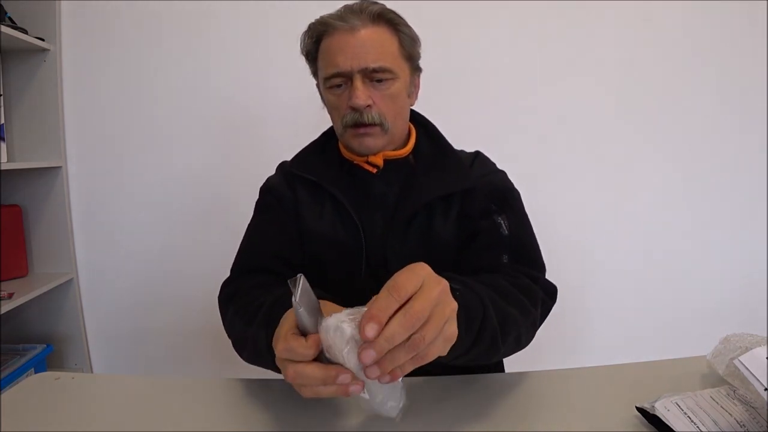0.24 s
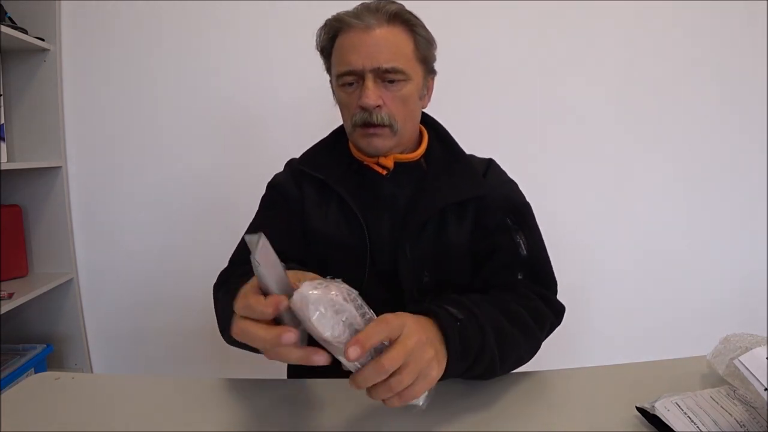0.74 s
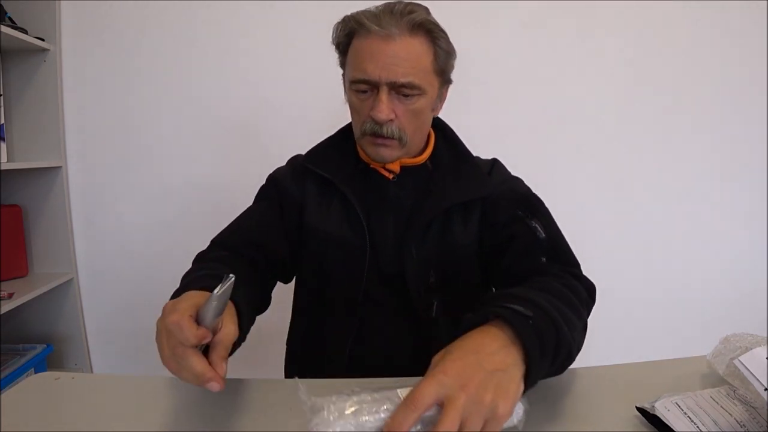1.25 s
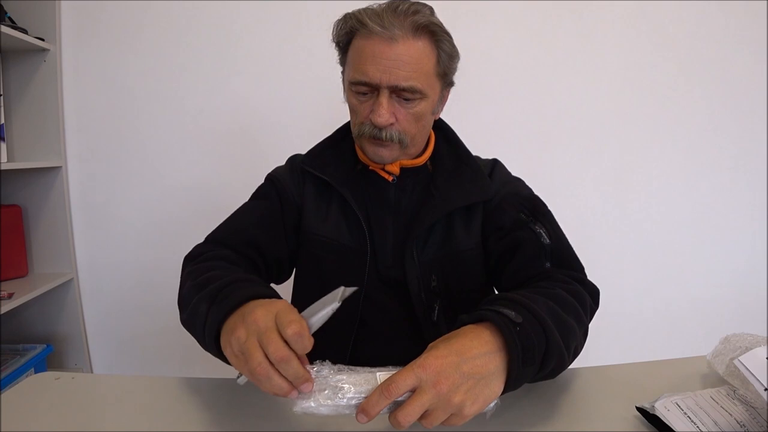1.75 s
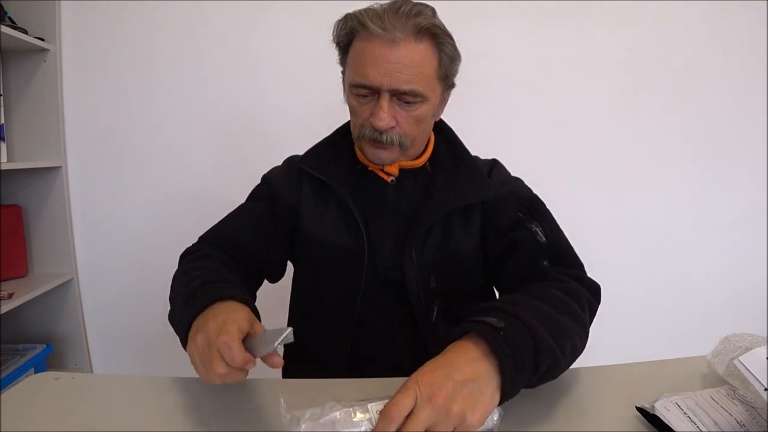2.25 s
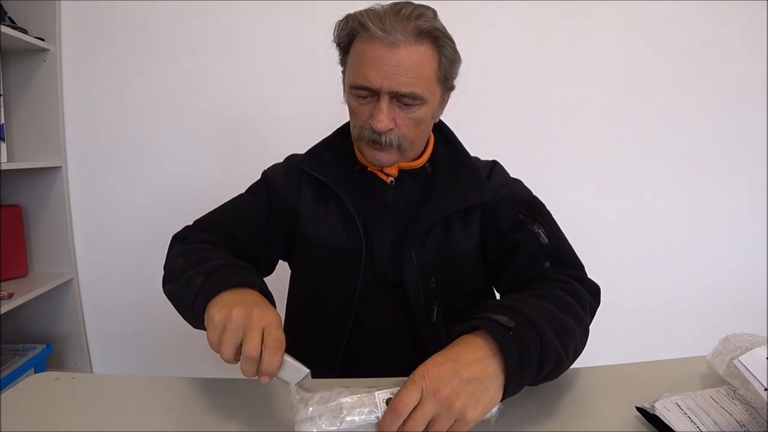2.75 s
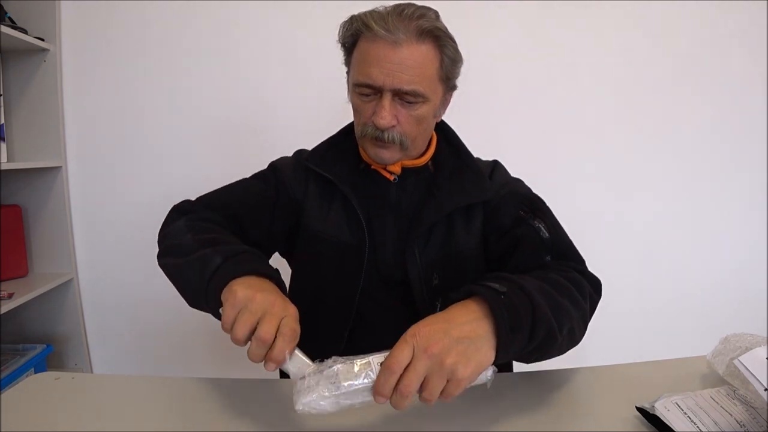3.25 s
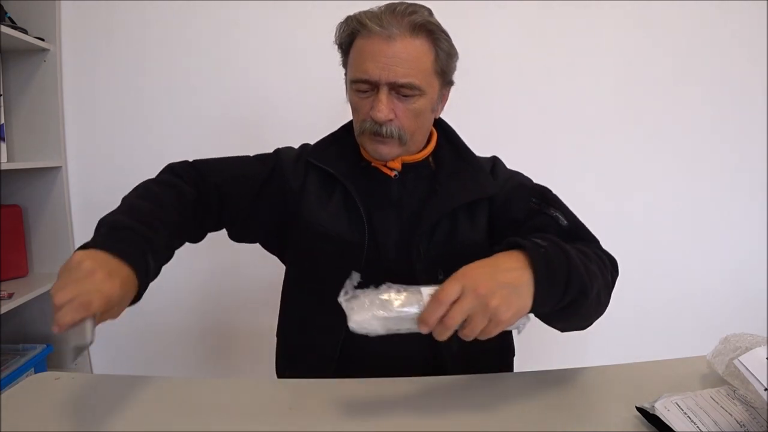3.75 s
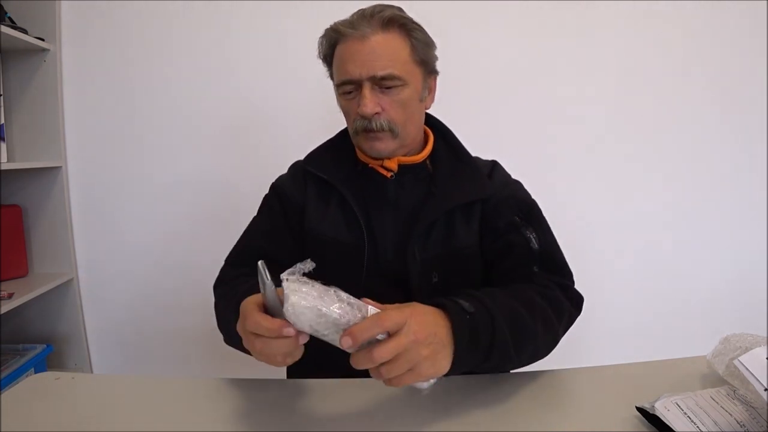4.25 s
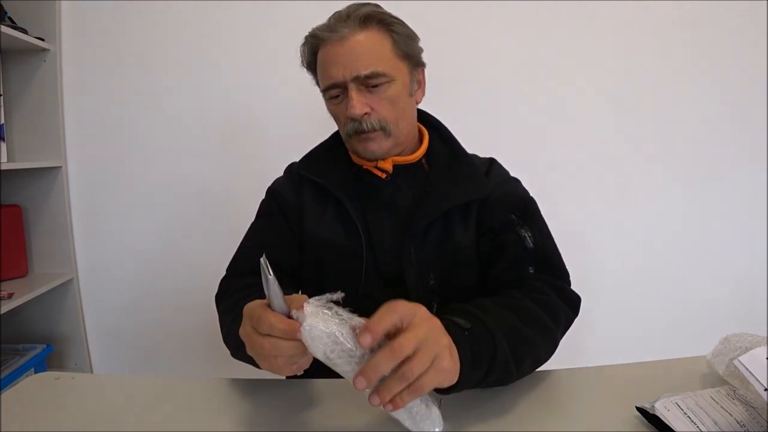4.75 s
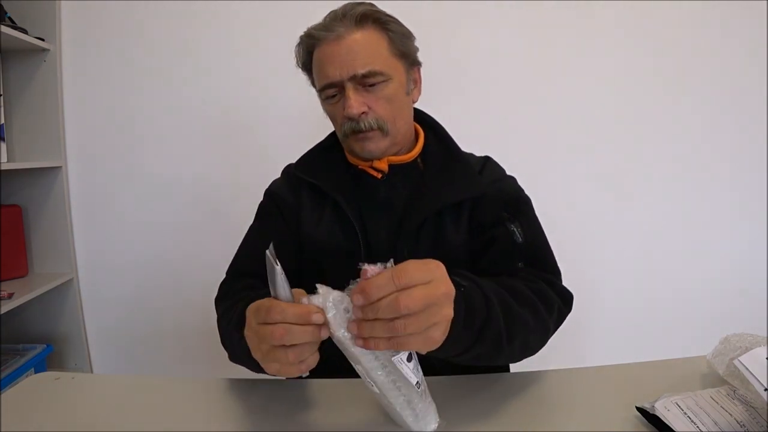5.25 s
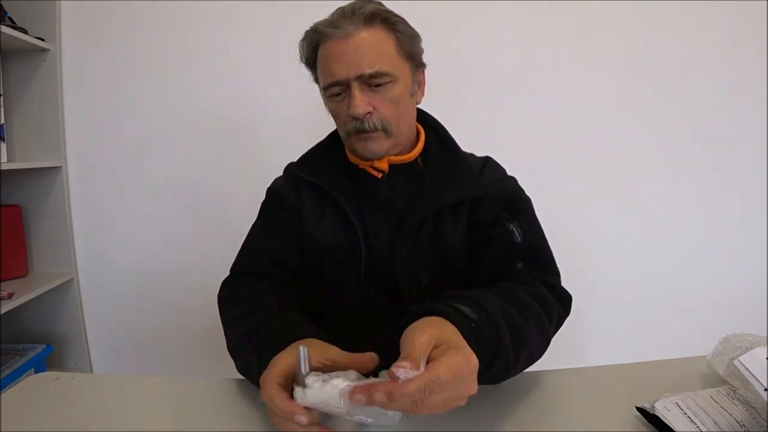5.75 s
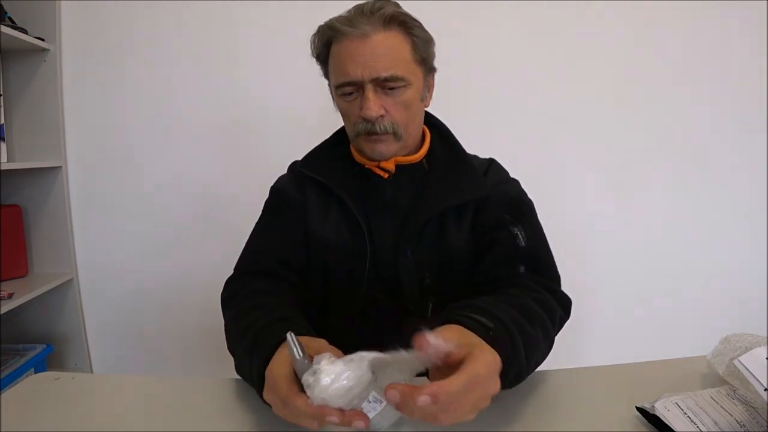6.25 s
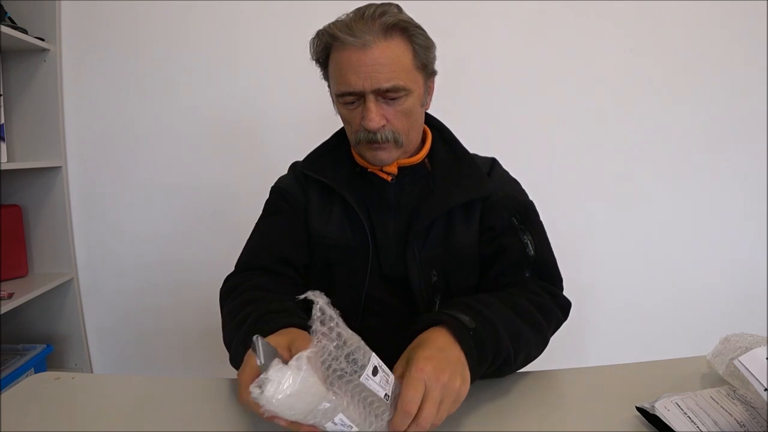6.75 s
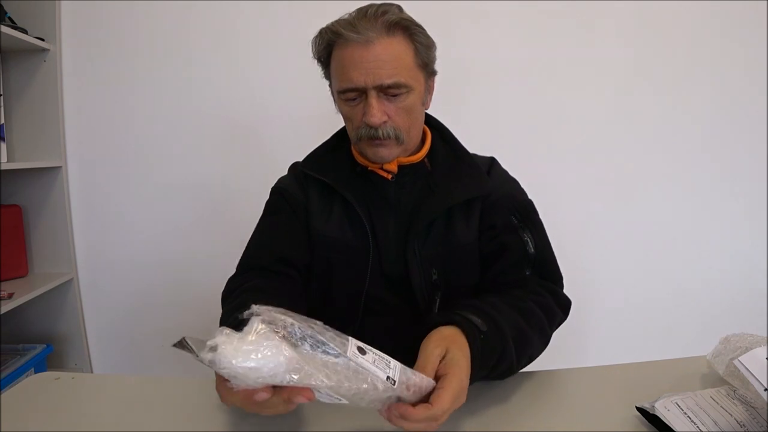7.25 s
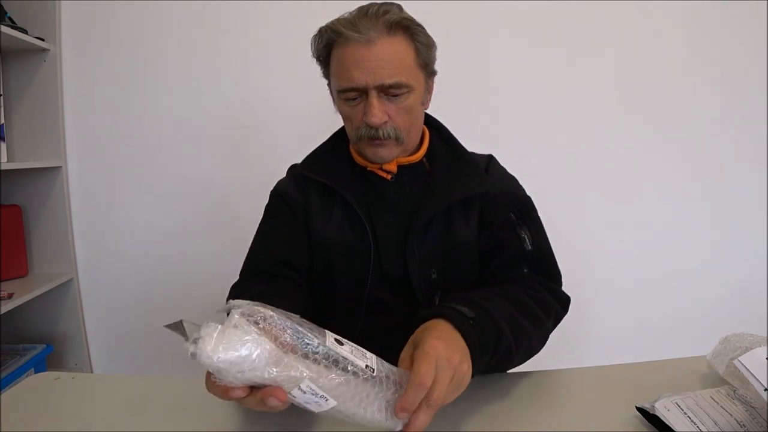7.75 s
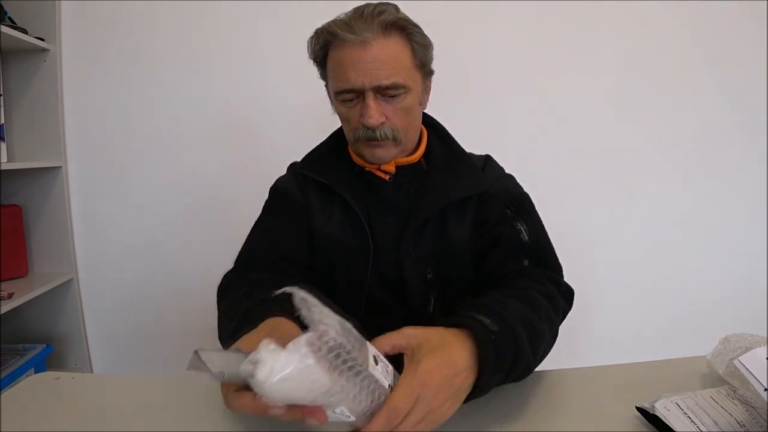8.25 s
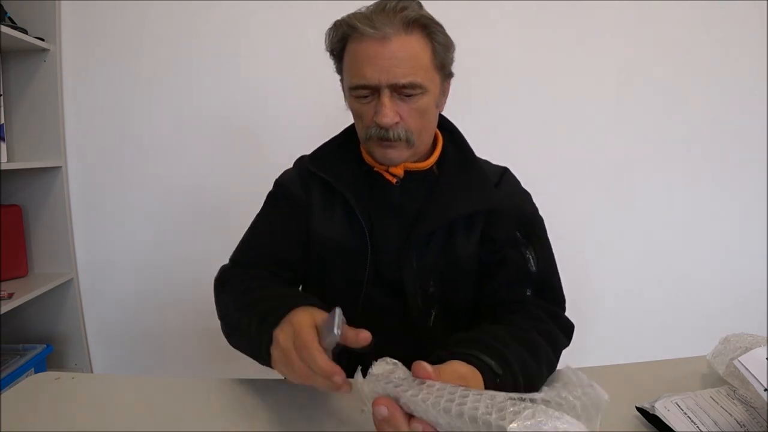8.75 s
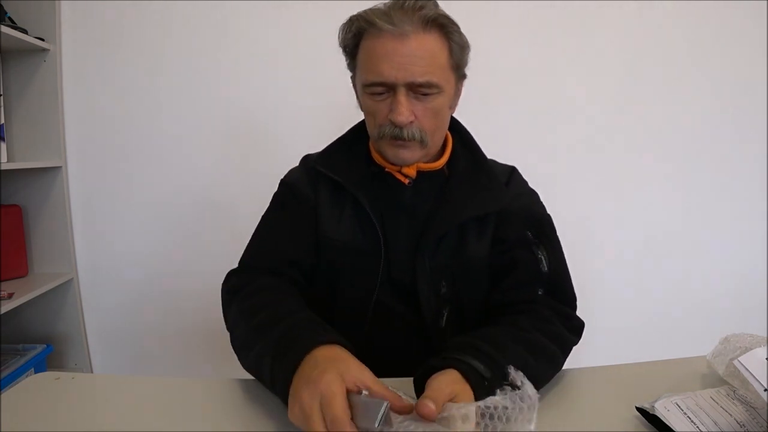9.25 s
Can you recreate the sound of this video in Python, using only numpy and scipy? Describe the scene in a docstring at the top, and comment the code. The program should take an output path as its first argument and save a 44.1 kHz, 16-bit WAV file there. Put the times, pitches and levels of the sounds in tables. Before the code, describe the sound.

Close, dry plastic rustling begins softly with scattered sharp ticks and small dull bumps. Around the middle third a knife scrapes briefly, snaps through the film and sweeps away in a smooth hiss. Denser, brighter crumpling follows in bursts while the wrap is opened, then damped metallic clinks mix with the last crackles. Small room with faint short echoes, soft microphone hiss and a low rumble.

```python
"""Bubble wrap crackles as hands turn and unwrap a tool over a desk in a small bare room.
Countless tiny creases excite the film and its air cushions as noise bursts; folds and tape let go as
short snaps. Cushions and bumps thud as brief damped tones, a knife rubs and then sweeps along the desk,
and the metal inside rings in decaying modes. Sparse echoes, steady hush and a low rumble surround it."""
import sys
import numpy as np
from scipy import signal
from scipy.fft import rfft, irfft, next_fast_len
from scipy.io import wavfile
from scipy.ndimage import uniform_filter1d

SR = 44100
rng = np.random.default_rng(int(sys.argv[2]) if len(sys.argv) > 2 else 0)


def store_wav(level_fs):
    """Save 16-bit WAV to argv[1]."""
    pcm = np.round(np.clip(np.atleast_2d(level_fs), -1, 1) * 32767)
    wavfile.write(sys.argv[1], SR, pcm.T.astype(np.int16))


N = 419391

# Steady work of the hands: t/s, effort level/dB, cushion level re effort/dB, crisp-edge level re effort/dB
HAND_WORK = [(0, -53, 0, -3), (.09, -55.5, -2.5, -6), (.2, -46, -7.5, 5), (.43, -50.5, 1, 0.5),
             (.9, -51.5, -2, 5.5), (1.15, -47, -1, 4), (1.2, -54.5, -1.5, -8), (1.46, -63, -2, 3),
             (1.5, -73, -6, -20), (1.57, -59.5, 3.5, 8), (1.85, -50, -2.5, 2), (2.02, -62, 5.5, 2),
             (2.18, -52.5, 0, -5), (2.4, -64.5, 2.5, 2.5), (2.79, -80, 2, 14), (2.9, -62, -10, 2),
             (3.12, -56.5, -4.5, -6), (3.4, -47, -12, -1.5), (3.66, -48.5, 6.5, 3), (3.8, -53.5, 10, -18),
             (4.13, -55, 2, -12), (4.2, -51.5, -6, -2), (4.95, -47, -4, 0), (5.2, -49, 3, 1),
             (5.45, -49.5, -3.5, 5), (5.75, -58, -5, -3), (6.1, -41.5, -5.5, -9), (6.45, -51.5, -2.5, -9),
             (6.6, -47, -2, 2), (7.4, -47.5, -4.5, -3.5), (7.95, -56, -1.5, 3.5), (8.15, -51, 1.5, 3.5),
             (8.6, -48.5, -1, -4), (9.07, -55.5, -1.5, 2.5), (9.51, -45.5, -10, 4.5)]
# Handfuls of film crumpling: t of the height/s, effort level/dB, settling time/s,
# cushion level re effort/dB, crisp-edge level re effort/dB
CRUMPLE_EVENTS = [(0.005, -46, 0.036, -4.5, 1), (.134, -57, 0.012, -27, 15), (0.288, -52, 0.081, 1.5, -6),
                  (0.75, -49.5, 0.048, -2, 1), (1.058, -36.5, 0.01, -11, -3),
                  (1.121, -41.5, 0.014, -2, 9.5), (1.533, -46.5, 0.036, -3.5, 3),
                  (1.601, -42, 0.021, -22, 6), (1.854, -44.5, 0.0099, -22, -16),
                  (2.107, -49.5, 0.056, -9, 5.5), (2.827, -39, 0.007, -22, -2),
                  (3.138, -51.5, 0.014, -4, -11), (3.319, -43.5, 0.038, -4.5, -1),
                  (3.614, -28, 0.013, -3, 0), (4.641, -48.5, 0.018, 3.5, -10), (5.041, -37, 0.012, -1.5, 0),
                  (5.124, -34.5, 0.018, -5, 6), (5.336, -46, 0.038, -27, 1), (5.542, -45, 0.05, -4.5, -4),
                  (5.815, -48, 0.027, -5, 2), (5.881, -41.5, 0.022, -6, -8), (5.966, -32.5, 0.049, -11, -4),
                  (6.021, -35.5, 0.039, -3.5, 2.5), (6.25, -40.5, 0.064, -8.5, 4.5),
                  (6.52, -46.5, 0.058, -17, 1), (6.656, -42.5, 0.076, -10, -3),
                  (7.006, -42, 0.079, -5, 1.5), (7.178, -44.5, 0.033, -1.5, -1),
                  (7.59, -43, 0.076, -6.5, 3), (8.059, -40, .012, -25, 7.5), (8.108, -36.5, 0.0091, 1, -9),
                  (8.331, -38.5, 0.013, -5, -1), (8.411, -39, 0.034, -10.5, 0),
                  (8.533, -36, 0.0097, -3, -20), (8.665, -37.5, 0.027, 0.5, -2.5),
                  (8.741, -39, 0.013, -4.5, -7), (9.124, -46.5, 0.035, -18, 1.5),
                  (9.24, -47, 0.036, -2.5, -6), (9.361, -37.5, 0.028, -7.5, -6),
                  (9.474, -38, 0.029, -5, -13)]
# Air pockets held in a fold: start t/s, end t/s, f/Hz, level re film/dB
AIR_POCKETS = [(0.21, 0.397, 1780, -1), (1.05, 1.166, 2200, -3), (4.805, 5.16, 2040, -3.5),
               (5.02, 5.51, 3700, -14), (5.906, 6.12, 3720, -18), (8.629, 8.741, 3010, 4)]
# Folds and tape letting go: t/s, relative level/dB, pitch f/Hz, tautness (crisp edges over film)/dB
SNAP_EVENTS = [(0.013, -19, 6970.0, 2), (0.0274, -22.5, 7080.0, -3), (0.058, -30, 3060, -5),
               (0.1315, -16, 4580, -7), (0.1846, -10, 8240, 8), (0.2683, -27, 1850, -5),
               (0.2913, -27, 1900, -20), (0.3003, -32, 1830, -14), (0.343, -23.5, 6570, 4),
               (0.387, -23.5, 1890, -6), (0.3953, -27, 1550, -12), (0.6176, -23, 6920.0, -10),
               (0.7569, -22, 6270.0, -2), (0.9537, -20.5, 6700, 26), (1.0447, -17, 6800.0, -7),
               (1.0523, -25, 6090, 9), (1.0596, -22.0, 6730.0, 2.0), (1.098, -19, 2280, 3),
               (1.1296, -16.5, 2330.0, 6.0), (1.3225, -29.5, 3050.0, -6), (1.3281, -28.5, 8090.0, 13),
               (1.5644, -28, 6180, 5), (1.6036, -37, 6370.0, 6.0), (1.6093, -9, 6200, 3),
               (1.639, -30, 8030, 6), (1.8705, -22, 7100.0, 11.0), (2.0486, -25.0, 8100, -10),
               (2.1244, -25.5, 6430.0, -10), (2.2618, -23.5, 7500, 6.0), (2.8266, -17, 6450, 6.0),
               (2.9541, -22.5, 6690.0, 15), (3.135, -24, 4590.0, 0), (3.3012, -18, 5240, -3),
               (3.3809, -20.5, 6400, 11), (3.4215, -24.5, 7110, 8), (3.4876, -23.5, 6830.0, 7),
               (3.534, -28, 3230, 4), (3.558, -26, 6700, 8), (3.5917, -18, 2430.0, 0),
               (3.6154, -10.5, 2070.0, 2), (3.6199, -7.5, 5940.0, 1), (3.654, -12, 7540.0, 2.0),
               (4.1094, -26.5, 7000, 21), (4.208, -18.5, 5970, 12), (4.4219, -28, 5890.0, -9),
               (4.5492, -26, 7240.0, -9), (4.5657, -29, 5960.0, -5), (4.6735, -28, 2140.0, -19),
               (4.9727, -18, 4110, 5), (5.0082, -20, 3610.0, -7), (5.0119, -22, 2190.0, -7),
               (5.0323, -17, 3450.0, 2), (5.0422, -15, 7140.0, -1), (5.0464, -25, 2000.0, -7),
               (5.059, -25, 1960, 0), (5.0723, -16, 3530.0, -1), (5.0999, -22, 6330.0, 0),
               (5.1042, -15.5, 6750.0, 4), (5.1083, -14.5, 2060.0, -7), (5.122, -19, 3660.0, -14),
               (5.1336, -10, 6560.0, 18), (5.1545, -12, 1720, -4), (5.2014, -25, 7240, 13),
               (5.2219, -21, 7450.0, 2.0), (5.2324, -24.0, 6260.0, -3), (5.2404, -19.5, 3050.0, -2.0),
               (5.2577, -21.5, 6230, -2), (5.287, -23, 3980, -15), (5.3062, -13.5, 7130.0, -2),
               (5.3224, -17, 1910.0, -3), (5.3276, -16.5, 3760.0, -2), (5.3365, -27, 7040, 5),
               (5.3506, -25.0, 3560.0, 0), (5.362, -26, 7170, 5), (5.3777, -17.5, 1830.0, -12),
               (5.3878, -19.5, 3620.0, -6), (5.4117, -20.0, 5670.0, 0.0), (5.4488, -22, 5920.0, -2),
               (5.5661, -24.0, 5750.0, 4), (5.5698, -25.5, 2080.0, -14.0), (5.8748, -19, 2940, -21),
               (5.9453, -16.5, 3640.0, -17), (5.9611, -19, 2910.0, -5.0), (5.9713, -15, 6890.0, 0),
               (5.9752, -11.5, 3050, -16), (6.0047, -11, 5060, 10), (6.01, -5.0, 3800, -2.0),
               (6.0282, -22, 3190.0, -12), (6.0405, -3.5, 3140, -30), (6.0596, -22, 3700.0, -5.0),
               (6.1793, -16, 3700, -2.0), (6.2013, -16, 4070.0, -15.0), (6.2078, -12, 5850, 7),
               (6.2162, -24, 6980.0, 10), (6.2766, -18, 5510, 12), (6.2994, -21, 6550, 9),
               (6.3051, -13, 6380.0, 10), (6.4146, -33, 2350.0, -17), (6.553, -29, 3880, -12),
               (6.6858, -16, 1950, -15), (6.7159, -14.5, 6540.0, 11.0), (6.7311, -20.0, 6330.0, 2),
               (6.9302, -22.0, 3460.0, 1), (6.9762, -22, 6430.0, 2.0), (6.9902, -24, 6550, 4),
               (7.0056, -29, 6960, 4), (7.0369, -22.0, 7110.0, 2.0), (7.0472, -16.5, 3490, 6),
               (7.0687, -18.5, 7060, 6.0), (7.093, -23.0, 3390.0, -6.0), (7.1527, -29, 2170, -6),
               (7.1685, -17, 6450.0, 6.0), (7.1833, -29, 7200.0, 6.0), (7.1929, -13.5, 6570.0, 8),
               (7.2157, -21.0, 6300.0, -6), (7.2199, -16.5, 6570.0, 2), (7.296, -15, 4000, 12),
               (7.3057, -12, 6450, 21), (7.3461, -24, 6860.0, 8), (7.378, -26, 3650.0, -3.0),
               (7.3846, -21.5, 3310.0, -3), (7.4462, -14.0, 9200, 9), (7.5607, -12, 5200, 5),
               (7.5742, -22, 7340.0, 10), (7.614, -23, 6030, 10), (7.6512, -20, 6340.0, 4),
               (7.6655, -22, 7080.0, 6.0), (7.7485, -29.5, 6440.0, 1), (7.8569, -19, 5930, 12),
               (8.0034, -26, 1510.0, -1), (8.065, -18, 4740.0, 0.0), (8.0687, -15, 4450.0, -7),
               (8.104, -14.5, 7500, 8), (8.1431, -25, 2300.0, -14), (8.4413, -27, 6020.0, -11),
               (8.6817, -26, 2920.0, -15.0), (8.7328, -32, 3050.0, -16.0), (8.7435, -19.0, 1800, -15),
               (8.7483, -25, 3010.0, -14), (8.8172, -25, 3380.0, -19), (8.9947, -25.5, 6400.0, 17),
               (9.1139, -27, 3340.0, -8), (9.1212, -25.0, 5930.0, -4), (9.3002, -20, 3140.0, -6),
               (9.3366, -26, 7000, 10), (9.46, -19, 6400, -7)]
# Kinds of fold that small snaps pick from: central pitch f/Hz, tautness/dB
FOLD_KINDS = [(2000, -11.5), (3760, 1), (6900, -1), (5800, -5)]
# Squeezed cushions and bumps of the parcel: t/s, relative level/dB, pitch f/Hz
THUD_EVENTS = [(0.397, -35, 1340), (0.6174, -42, 800), (1.06, -36, 607), (1.1238, -34.0, 505),
               (1.1733, -40, 540), (1.5208, -39, 1060.0), (1.61, -31.5, 1430), (1.8187, -32, 1190),
               (1.847, -39, 1220), (1.857, -37.5, 1040), (2.0692, -37.5, 680.0), (2.1351, -27.0, 1250.0),
               (2.2064, -36, 1220.0), (3.1352, -38, 1250), (3.2528, -41, 910), (3.3038, -30.5, 990),
               (3.32, -33, 925), (3.418, -40, 1350.0), (3.5928, -32.5, 310.0), (3.6154, -19, 580),
               (3.6555, -31, 1120), (3.6956, -34, 595), (4.0139, -41, 415), (4.209, -40.5, 860.0),
               (4.6745, -36, 790.0), (5.1567, -39, 1310), (5.3795, -32.5, 885), (5.5329, -38, 415),
               (5.8747, -30.5, 390), (5.9463, -34.5, 1040), (6.0089, -32, 1370), (6.046, -36.5, 200),
               (6.2247, -34.5, 530), (6.686, -33, 1310), (6.9315, -33.5, 232), (7.034, -39.5, 148),
               (7.0965, -39, 830), (7.221, -36, 258), (7.3784, -37.5, 1240.0), (8.0037, -42, 1040),
               (8.1055, -24.5, 910), (8.3493, -35.0, 390.0), (8.5289, -38, 1280), (8.6702, -32.0, 1280.0),
               (9.1144, -38.5, 1340), (9.3606, -33, 1290)]
# Blade rubbing on the film: t/s, level/dB, pitch f/Hz
BLADE_RUB = [(3.21, -73, 967), (3.224, -54, 970), (3.256, -52, 920), (3.274, -57, 950), (3.302, -40, 1040),
             (3.372, -55, 1010), (3.44, -55, 961)]
# Knife cutting through and sweeping along the desk: t/s, level/dB
KNIFE_SWEEP = [(3.61, -58), (3.63, -35), (3.75, -38.5), (3.9, -47.5), (4.03, -45.5), (4.09, -78)]
# Jolts to the metal: t/s, level/dB, upper modes re lowest/dB, share of the free ring time left by the grip
METAL_JOLTS = [(8.326, -32, -1, .45), (8.477, -36, -20, 0.26), (8.537, -34.5, -20, 0.65),
               (8.675, -26.5, -20, .3), (8.738, -36.5, 5, 0.54), (9.343, -39, -9, .65),
               (9.459, -25.5, -14, 0.85)]
# Free modes of the metal, lowest first: f/Hz, level/dB, 60 dB decay time/s
METAL_MODES = [(3127, 0, 0.17), (6060, -3, 0.12), (7000, -5, .12)]
# Low rumble that comes and goes: t/s, relative level/dB
RUMBLE_LEVEL = [(0, -63), (2.0, -62.5), (2.2, -75), (3.5, -79), (4.1, -57.5), (5.1, -60), (5.4, -63),
                (7.2, -70.5), (9.51, -74)]
# Response of the film: f/Hz, relative level/dB
FILM_RESPONSE = [(600, -57.0), (1300, -3.0), (2000, 1.0), (3300, 2.5), (5000, 0.0), (7000, -1.0),
                 (12000, -32.0)]
# Response of the crisp edges: f/Hz, relative level/dB
CRISP_RESPONSE = [(3000, -11), (5000, -8.5), (6600, 3.5), (8000, -0.5), (9300, -2.5), (10800, 5),
                  (14000, 0)]
# Response of the air cushions: f/Hz, relative level/dB
CUSHION_RESPONSE = [(100, -15), (250, -3), (600, -0.5), (1200, 0), (2000, -6.5), (4000, -51)]
# Response of the desk under the sweeping knife: f/Hz, relative level/dB
DESK_RESPONSE = [(90, -46), (150, -13), (375, -2.5), (500, -1), (632, 3.5), (812, -9), (1120, -6.5),
                 (1960, -3.5), (3600, -12), (4300, -2), (5000, -8), (5600, -7), (11000, -28.5)]
# Spectrum of room tone and microphone noise: f/Hz, relative level per Hz/dB
HUSH_SPECTRUM = [(12, -21), (20, 4.5), (59, -9), (92, -3), (127, -6.5), (174, -4.5), (259, -7.5), (303, -5),
                 (4480, -19), (6660, -27), (11000, -27), (14300, -63), (22000, -120)]
# Left-right likeness of that noise: f/Hz, correlation (0 to 1)
HUSH_LIKENESS = [(25, 1), (100, 0.33), (500, 0.067), (4000, 0.058), (11000, 0.18)]
# Decay of the echoes from the walls: f/Hz, 60 dB decay time/s
WALL_DECAY = [(200, 0.5), (1000, 0.64), (4000, 0.5), (10000, 0.4)]
# Falling top of the band: f/Hz, level/dB
TOP_RESPONSE = [(11000, -0.5), (11150, -21.5), (11600, -26.5), (12400, -56)]

HUSH_DB, ECHO_DB = -58, -9
LEFT_OVER_RIGHT_DB = 1.5
BAND_EDGE_HZ = 12409
BARED_S = 8.32  # the wrap comes off the metal
RUSTLE_WIDE_DB, SNAP_WIDE_DB = -11, -15.5  # part that differs between the sides, re shared part
GRIP_SHARE = 0.54  # build-up time of a crumple over its settling time
SNAP_S, SNAP_CYCLES = .0004, 1  # decay time of a snap: a fixed time plus cycles of its pitch
TICKS_PER_S = 55
TICK_DB, TICK_SPREAD_DB = 10, 4  # small snaps re effort of the hands
BREAK = 2.49  # impulse at the instant of letting go, re the noise around it


def gain_of(db):
    """Level definition: amplitude ratio is 10 to the power dB/20."""
    return 10 ** (np.asarray(db) / 20)


def evened(x):
    """Normalization: mean power is set to one."""
    return x / np.sqrt(np.mean(x ** 2) + 1e-20)


def read(points, hz):
    """Interpolation: a curve is linear between points on a log-frequency axis."""
    f, value = np.transpose(points)
    return np.interp(np.log(hz + 1), np.log(f + 1), value)


def colour(x, points):
    """Linear filtering: the spectrum of x is multiplied by a response."""
    size = next_fast_len(N)
    response = gain_of(read(points, np.fft.rfftfreq(size, 1 / SR)))
    return irfft(rfft(x, size) * response, size)[..., :N]


def add(mix, s, sound):
    """Superposition: a sound is summed into the mix from s seconds on."""
    part = mix[..., round(s * SR):][..., :sound.shape[-1]]
    part += sound[..., :part.shape[-1]]


def played(rows):
    """Time interpolation: columns at every sample, the level in the first being silent outside."""
    s, db, *others = np.transpose(rows)
    t = np.arange(N) / SR
    level_db = np.interp(t, s, db, -200, -200)
    return level_db, *(np.interp(t, s, column) for column in others)


def sides(pair, wide_db):
    """Sum and difference stereo: a shared part plus or minus a differing part."""
    shared, differing = pair
    difference = gain_of(wide_db) * differing
    return np.array([shared + difference, shared - difference])


def resonate(x, hz, width_hz):
    """Heterodyne resonance: shift hz to zero, smooth with a double pole, shift back."""
    turn = np.exp(2j * np.pi * np.cumsum(hz * np.ones(N)) / SR)
    r = np.exp(-np.pi * width_hz / SR)
    smoothed = signal.lfilter([1], [1, -2 * r, r * r], x / turn)
    return evened((turn * smoothed).real)


def creases(per_s, spread_db, clump_db, width_ms):
    """Shot noise: random buckles, a few large, come in clumps and drive two noises alike."""
    slow = uniform_filter1d(rng.standard_normal(N), size=700)
    clumps = evened(uniform_filter1d(slow, size=400))
    happens = rng.random(N) < per_s / SR
    size = gain_of(spread_db * np.minimum(rng.exponential(1, N), 4)) * happens
    burst = np.exp(-np.arange(400) / SR / (width_ms / 1000))  # decay of power
    power = abs(signal.oaconvolve(size ** 2, burst)[:N])
    return gain_of(clump_db * clumps) * np.sqrt(power) * rng.standard_normal((2, N))


def effort():
    """Addition of powers: steady hand work plus crumples sets film, cushion and crisp-edge gains."""
    t = np.arange(0, N + 64, 64) / SR
    s, *columns = np.transpose(HAND_WORK)
    effort_db, pressure_db, taut_db = (np.interp(t, s, column) for column in columns)
    power = gain_of([effort_db, effort_db + pressure_db, effort_db + taut_db]) ** 2
    for s, db, length, pressure_db, taut_db in CRUMPLE_EVENTS:
        since = (t - s) / max(length, .004)
        swell = np.exp(-np.where(since < 0, since / GRIP_SHARE, since) ** 2)
        peaks = gain_of(db + np.array([[0], [pressure_db], [taut_db]]))
        power = power + swell * peaks ** 2
    return [np.interp(np.arange(N) / SR, t, np.sqrt(p)) for p in power]


def rustle(film_gain, cushion_gain, crisp_gain):
    """Broadband excitation: creases shake film, pockets, crisp edges and, more smoothly, cushions."""
    t = np.arange(N) / SR
    fine = evened(creases(per_s=1500, spread_db=2.5, clump_db=2.0, width_ms=0.98))
    coarse = evened(creases(per_s=360, spread_db=3.0, clump_db=2.0, width_ms=2.9))
    film = evened(colour(0.84 * fine + 0.57 * coarse, FILM_RESPONSE))
    for start, end, hz, db in AIR_POCKETS:
        held = np.interp(t, [start - .02, start, end, end + .02], [0, 1, 1, 0])
        film = film + gain_of(db) * held * resonate(coarse, hz, width_hz=0.32 * hz)
    # once the tool lies bare, the creases also ring its lowest mode
    bared = t > BARED_S
    film = film + gain_of(-9.0) * bared * resonate(coarse, METAL_MODES[0][0], width_hz=60)
    crisp = evened(colour(fine, CRISP_RESPONSE))
    cushion = evened(colour(0.74 * fine + coarse, CUSHION_RESPONSE))
    total = film_gain * film + crisp_gain * crisp + cushion_gain * cushion
    return sides(gain_of(-3.0) * total, RUSTLE_WIDE_DB)


def walls(x):
    """Reverberation: sparse echoes of random sign, each band decaying exponentially at its own rate."""
    taps = np.zeros((2, SR))
    slots = np.arange(120, SR - 20, 20)  # one echo in every 20 samples
    at = slots + rng.integers(0, 20, (2, len(slots)))
    np.put_along_axis(taps, at, rng.choice([-1., 1.], at.shape), 1)
    hz, t, z = signal.stft(taps, SR, nperseg=256)
    decay = gain_of(-60 * t / read(WALL_DECAY, hz)[:, None])
    tail = signal.istft(z * decay, SR, nperseg=256)[1]
    return signal.fftconvolve(x[None], tail / np.linalg.norm(tail[0]), axes=1)[:, :N]


def hush():
    """Partial coherence: steady room and microphone noise shares a frequency-dependent part."""
    a, b = (rfft(v) for v in rng.standard_normal((2, N)))
    hz = np.fft.rfftfreq(N, 1 / SR)
    same = np.clip(read(HUSH_LIKENESS, hz), -1, 1)
    pair = np.array([a, same * a + np.sqrt(1 - same ** 2) * b])
    return gain_of(HUSH_DB) * evened(irfft(pair * gain_of(read(HUSH_SPECTRUM, hz)), N))


def rumble():
    """Band-limited noise: a deep band of 12 to 50 Hz, alike on both sides."""
    band = signal.butter(3, [12, 50], "band", fs=SR, output="sos")
    deep = signal.sosfilt(band, rng.standard_normal(N))
    return gain_of(played(RUMBLE_LEVEL)[0] - 3.0) * evened(deep)


def snaps(rows):
    """Sudden release: an impulse in a wide noise burst, strongest near its pitch."""
    out, t, hz = np.zeros((2, N)), np.arange(1024) / SR, np.fft.rfftfreq(1024, 1 / SR)
    lead = .003  # s of rise ahead of the release
    instant = np.arange(1024) == round(lead * SR)
    noise = rng.standard_normal((len(rows), 2, 1024))
    for (s, db, pitch_hz, taut_db), a in zip(rows, noise):
        since = (t - lead) / (SNAP_S + SNAP_CYCLES / pitch_hz)
        shape = np.exp(np.where(since < 0, 1.88 * since, -since))  # quick rise, slower fall
        peak = 0.59 + 1 / (1 + ((hz - pitch_hz) / (250 + .03 * pitch_hz)) ** 2)
        film = gain_of(read(FILM_RESPONSE, hz) - .5 * taut_db)
        crisp = gain_of(read(CRISP_RESPONSE, hz) + .5 * taut_db)
        burst = a * shape + BREAK * np.sign(a[:, :1]) * instant
        crack = irfft(rfft(burst) * peak * (film + crisp))
        add(out, s - lead, gain_of(db + 1.9) * crack / abs(crack).max(axis=1, keepdims=True))
    return sides(out, SNAP_WIDE_DB)


def ticks(film_gain):
    """Random point process: rows of small snaps whose level follows the effort of the hands."""
    when, size, fold, tune = rng.random((round(TICKS_PER_S * N / SR), 4)).T
    at = 200 + (when * (N - 400)).astype(int)
    excess = np.minimum(-np.log(1 - size), 2)  # capped exponential spread
    db = 20 * np.log10(film_gain[at]) + TICK_DB + TICK_SPREAD_DB * excess
    hz, taut_db = np.array(FOLD_KINDS)[(fold * len(FOLD_KINDS)).astype(int)].T
    return list(zip(at / SR, db, hz * (1 + 0.56 * (tune - .5)), taut_db))


def thuds():
    """Heavy damping: a squeezed cushion or bump gives a few cycles inside a wider puff of noise."""
    out, t = np.zeros((2, N)), np.arange(1500) / SR
    noise = rng.standard_normal((len(THUD_EVENTS), 2, 1500))
    body = gain_of(read(CUSHION_RESPONSE, np.fft.rfftfreq(1500, 1 / SR)))
    for (s, db, hz), a in zip(THUD_EVENTS, noise):
        rise = 0.001 + 0.18 / hz
        shape = t / rise * np.exp(1 - t / rise)
        puff = 0.54 * evened(irfft(rfft(a) * body))
        puff[0] += np.sin(2 * np.pi * hz * t)  # the tone is in the shared part only
        add(out, s - rise, gain_of(db - 0.5) * shape * puff)
    return sides(out, RUSTLE_WIDE_DB)


def knife():
    """Friction: uneven slips ring the film near one pitch; the sweep is a smooth rush through the desk."""
    rub_db, hz = played(BLADE_RUB)
    slips = creases(per_s=300, spread_db=3, clump_db=1, width_ms=3)
    rub = gain_of(rub_db) * resonate(slips, hz, width_hz=410)
    rush = colour(creases(per_s=2200, spread_db=0, clump_db=1, width_ms=3), DESK_RESPONSE)
    sweep = gain_of(played(KNIFE_SWEEP)[0]) * evened(rush)
    return sides(rub + sweep, RUSTLE_WIDE_DB)


def metal():
    """Modal ringing: each jolt is a short uneven scrape exciting modes that the hand damps."""
    out, t = np.zeros(N), np.arange(SR // 3) / SR
    fade = np.exp(-np.arange(2000) / SR / 0.01)
    scrapes = rng.standard_normal((len(METAL_JOLTS), 2000)) * fade
    for (s, db, upper_db, free), scrape in zip(METAL_JOLTS, scrapes):
        lowest, *upper = (gain_of(mode_db - 60 * t / (t60 * free)) * np.sin(2 * np.pi * hz * t)
                          for hz, mode_db, t60 in METAL_MODES)
        low = signal.fftconvolve(scrape, lowest)
        high = signal.fftconvolve(scrape, sum(upper))
        ring = low / abs(low).max() + gain_of(upper_db) * high / abs(high).max()
        add(out, s, gain_of(db) * ring)
    return out


def scene():
    """Superposition: direct sound and echoes lean left over the hush and rumble."""
    gains = effort()
    parcel = rustle(*gains) + snaps(SNAP_EVENTS) + snaps(ticks(gains[0])) + thuds() + knife() + metal()
    echoes = walls(parcel.mean(axis=0))
    balance = gain_of([[LEFT_OVER_RIGHT_DB / 2], [-LEFT_OVER_RIGHT_DB / 2]])
    leaning = (parcel + gain_of(ECHO_DB) * echoes) * balance
    return leaning + hush() + rumble()


def record(dry):
    """Band limitation: the top of the band falls away, then a steep low-pass ends it."""
    low_pass = signal.firwin(301, BAND_EDGE_HZ, window=("kaiser", 9), fs=SR)
    return signal.oaconvolve(colour(dry, TOP_RESPONSE), low_pass[None], "same")


dry = scene()
out = record(dry)
store_wav(out)
```